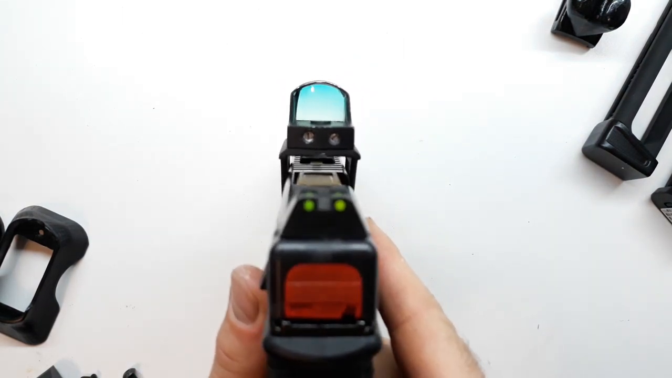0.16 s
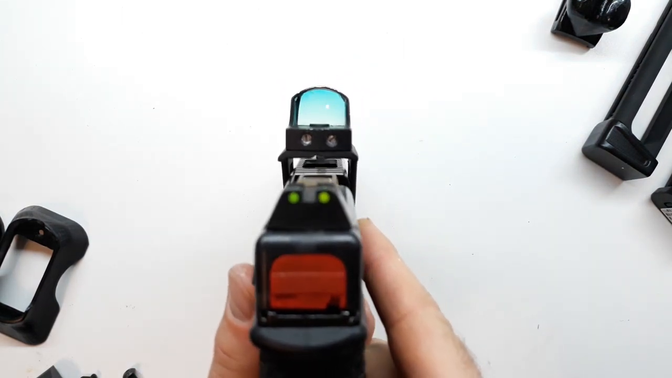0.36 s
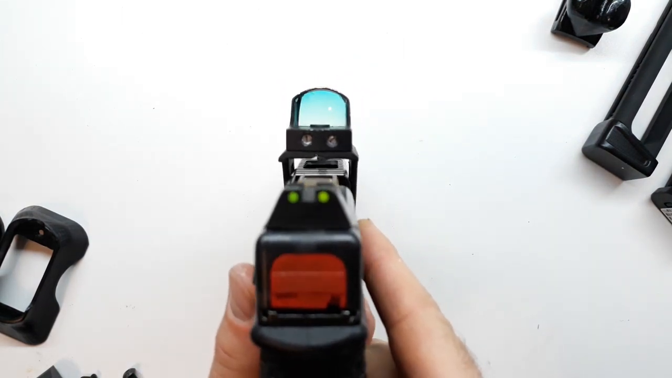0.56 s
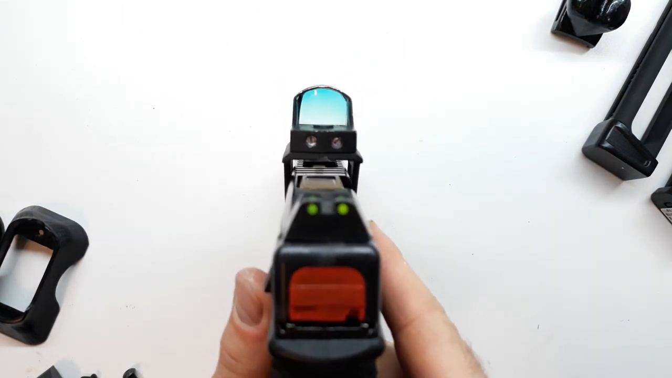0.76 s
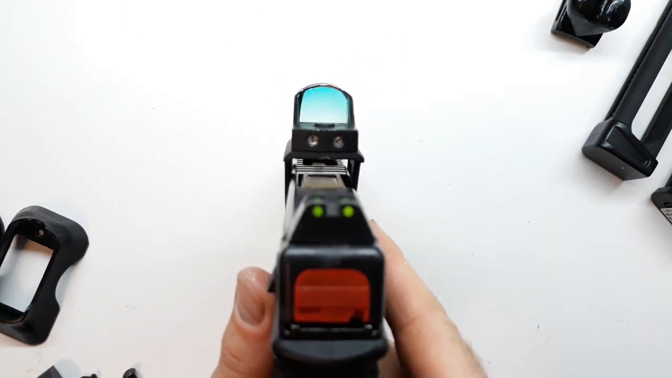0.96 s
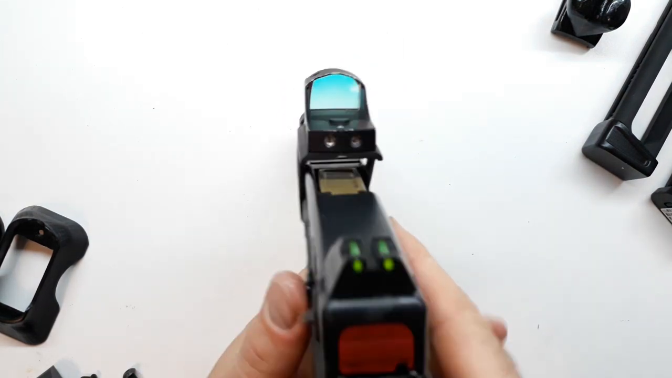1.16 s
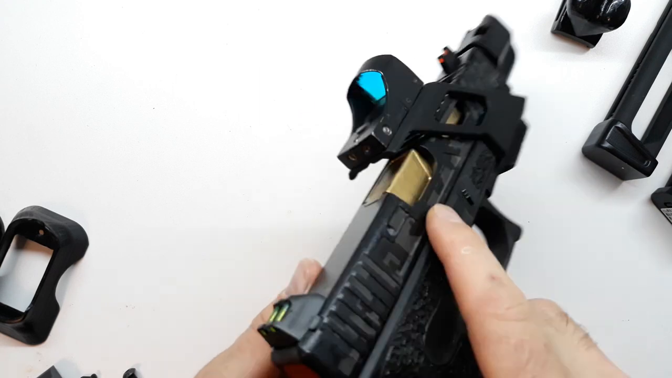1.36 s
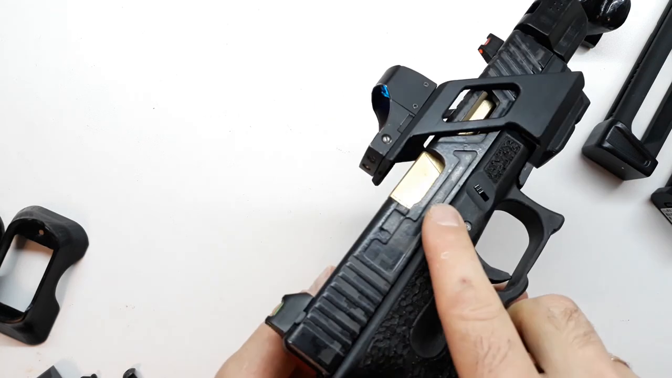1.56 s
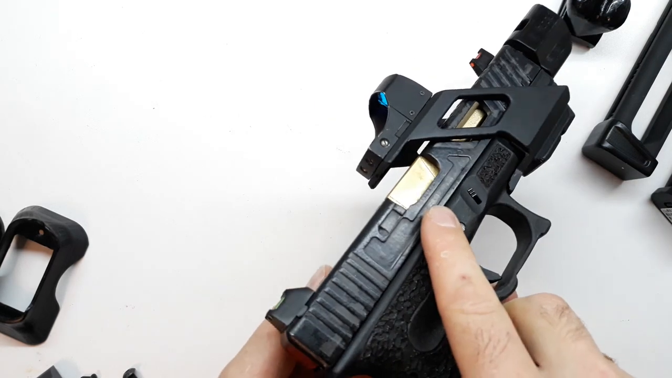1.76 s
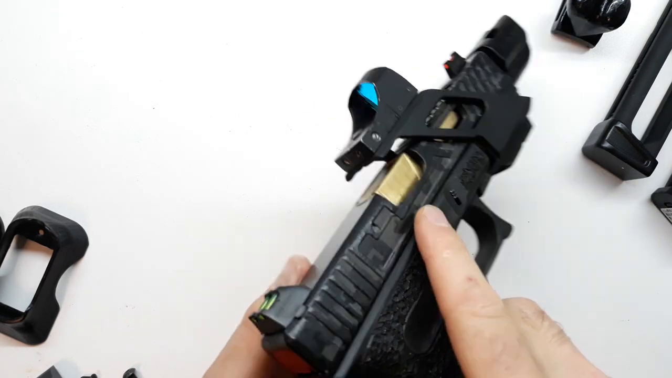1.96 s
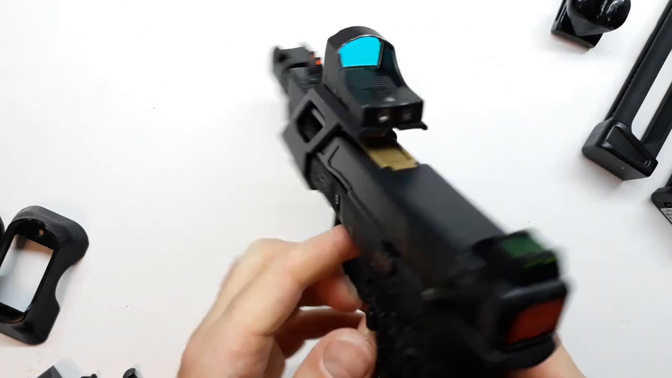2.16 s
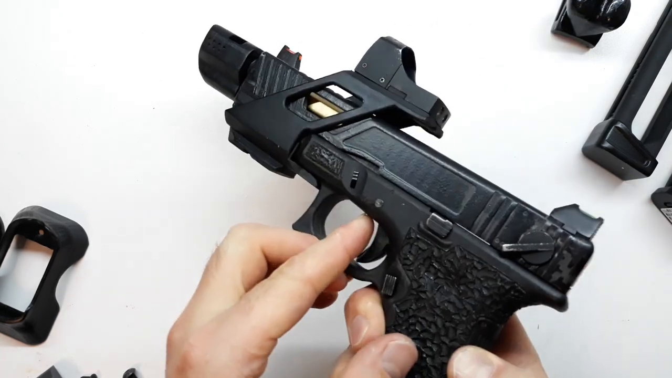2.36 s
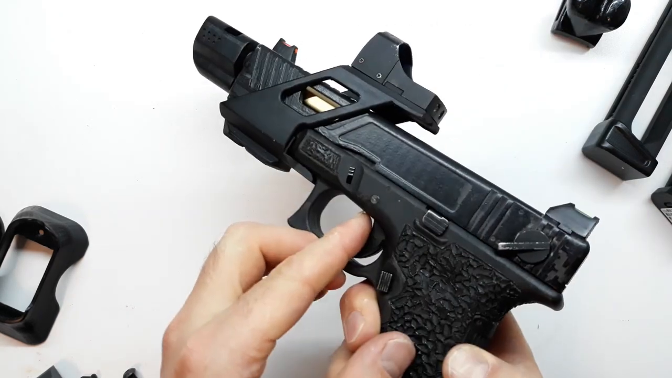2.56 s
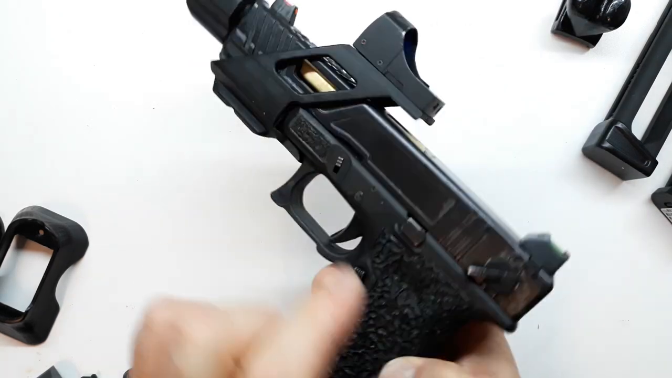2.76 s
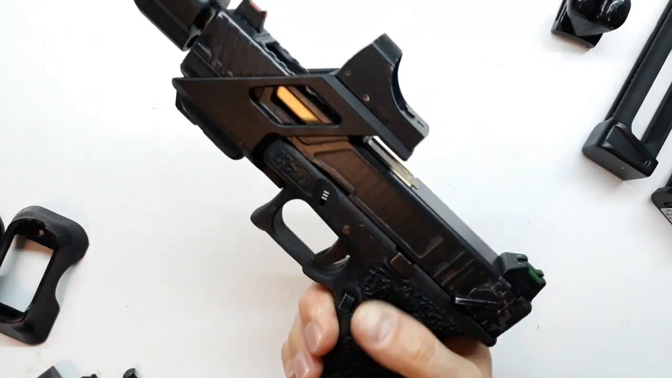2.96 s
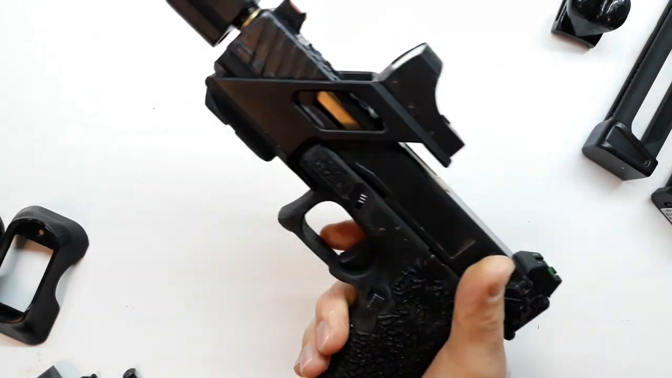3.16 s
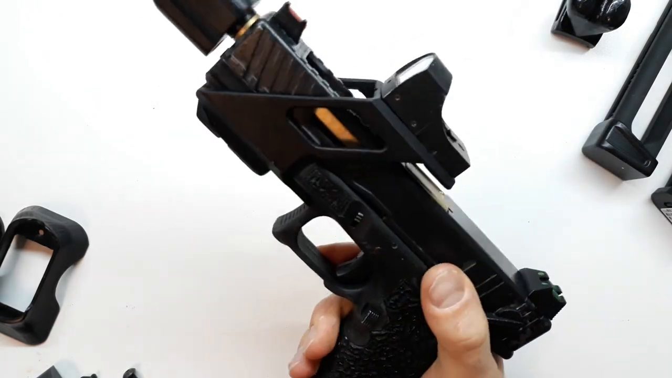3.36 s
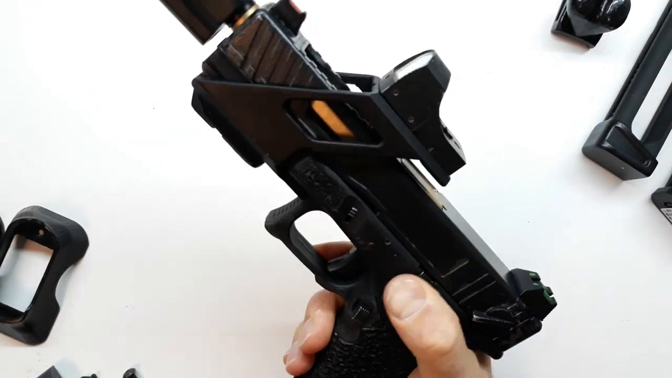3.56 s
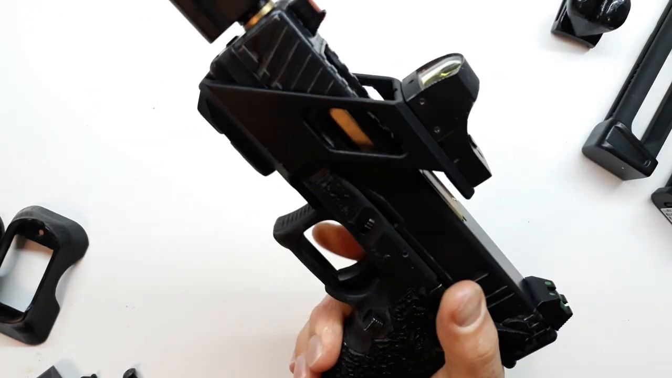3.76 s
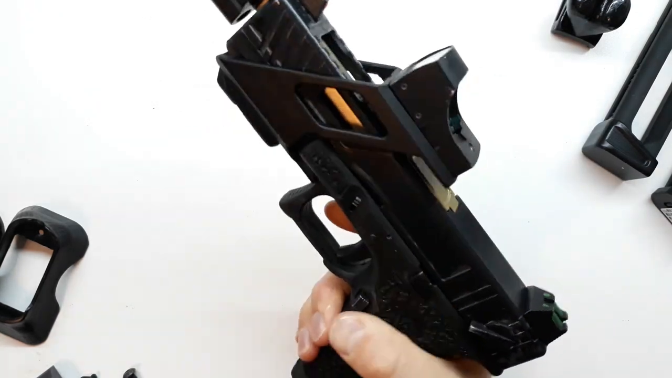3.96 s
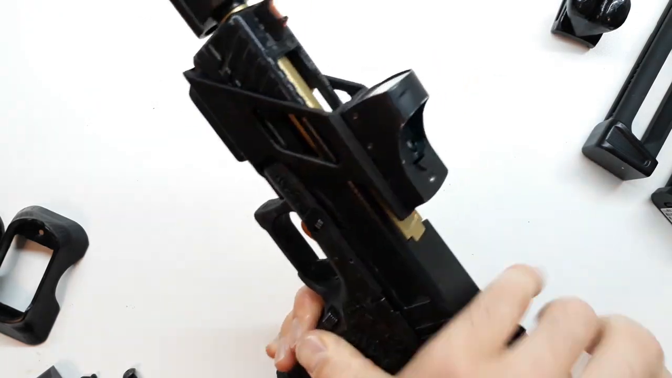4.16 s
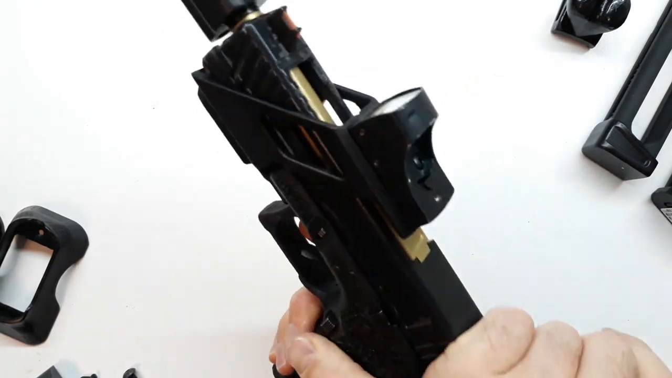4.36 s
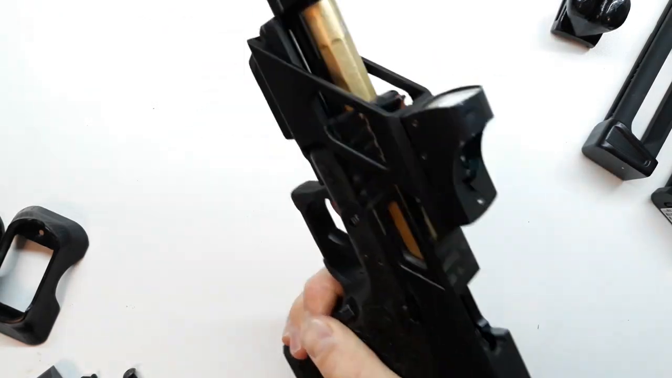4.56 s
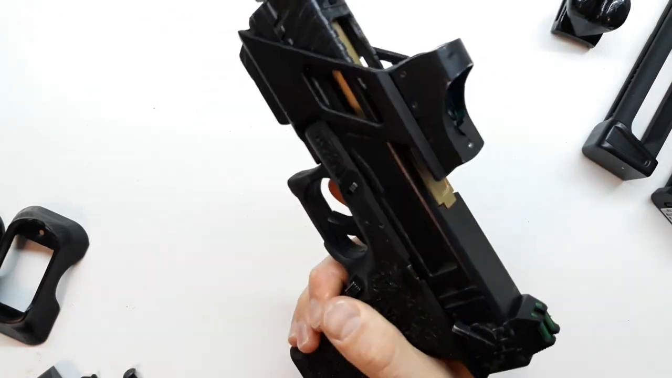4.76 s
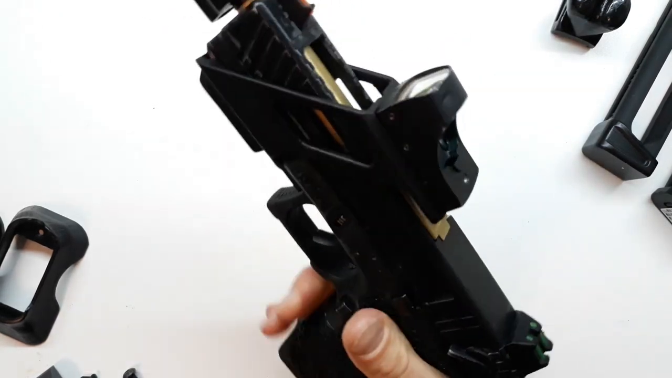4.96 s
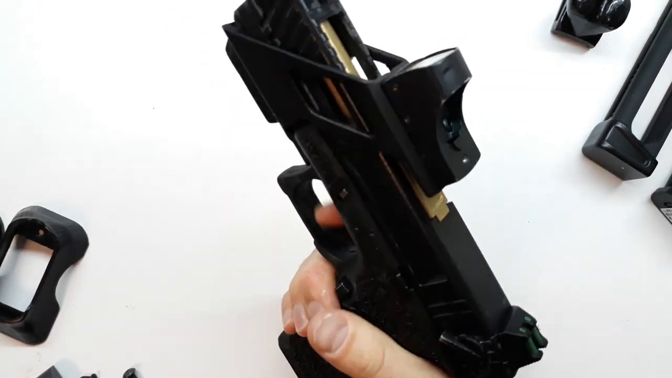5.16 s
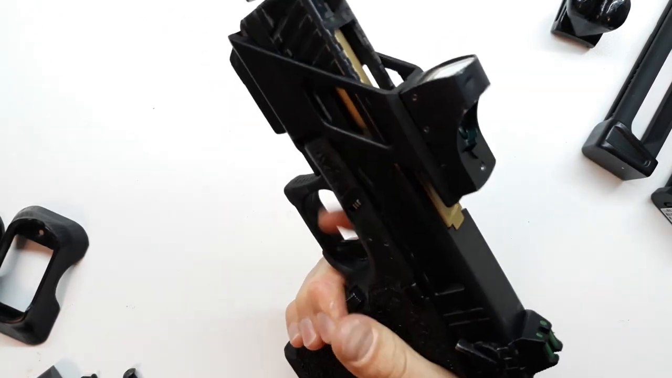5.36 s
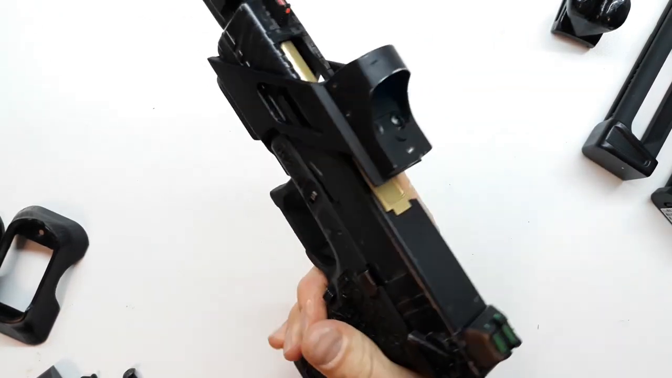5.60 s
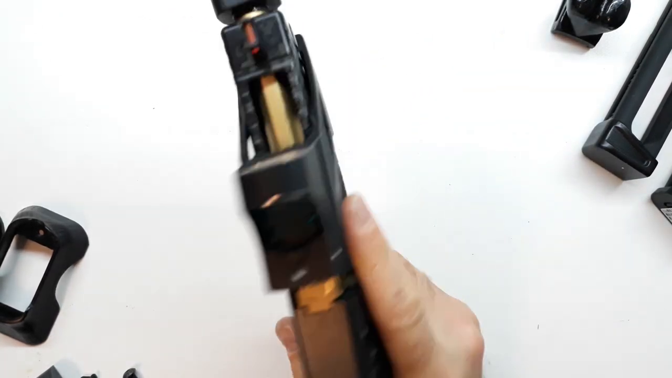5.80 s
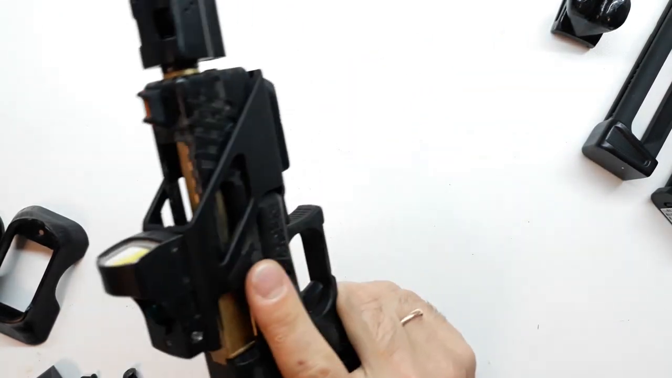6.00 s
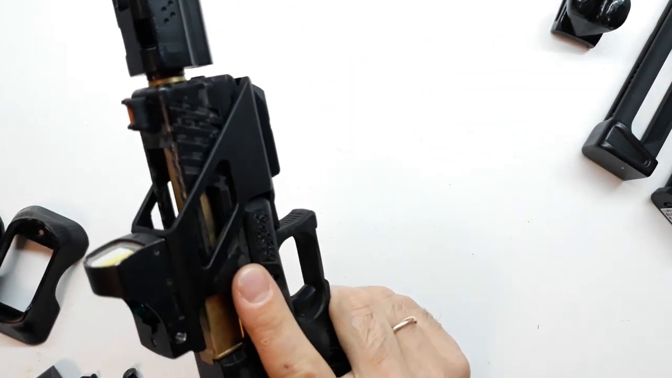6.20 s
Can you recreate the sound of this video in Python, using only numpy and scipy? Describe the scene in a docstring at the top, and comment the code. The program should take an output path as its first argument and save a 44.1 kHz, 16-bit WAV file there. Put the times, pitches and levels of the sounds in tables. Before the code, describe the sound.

A faint bed of low rumble, microphone hiss and swelling, throbbing hums runs throughout in a bare room, with a fan slowly gathering speed. From about 1.2 seconds a toy pistol is turned over close to the microphone: loose parts tick lightly and skin rubs softly on the grip. Small clicks come at 1.3, 2.3 and 3.2 seconds, with a clearer cluster around 3.7. At 4.4 seconds the slide is dragged back, clicking and scraping over its catches, and hits the rear stop with a loud clack at 4.5. Near 4.7 it slams home, the loudest sound, with a thump, a brief metallic ring and a short room echo. At 5.2 seconds the hammer drops with one sharp metallic snap. The overall level ducks at the clacks and stays down, leaving a fainter hum and a couple of tiny ticks until about 6.2 seconds.

```python
"""A bare room: a fan slowly gathers speed under swelling hums, low rumble and microphone hiss.
From about 1.2 s an airsoft pistol is turned over above a desk, parts ticking, skin rubbing on the grip.
At 4.4 s the slide is dragged back over its catches, hits the rear stop and slams home, metal ringing.
At 5.2 s the trigger drops the hammer. The gain control ducks at the clacks and stays down."""
import sys
import numpy as np
from scipy import signal
from scipy.fft import rfft, irfft, next_fast_len
from scipy.io import wavfile
from scipy.ndimage import uniform_filter1d, minimum_filter1d

SR = 44100
rng = np.random.default_rng(int(sys.argv[2]) if len(sys.argv) > 2 else 0)


def transcribe(u):
    """Save the signal u as a 16-bit wav file named by the first command-line argument.

    u: samples, shape (n,) or (channels, n), limited to [-1, 1]; the rate is SR.
    q: integer samples, one column per channel.
    """
    v = np.clip(np.atleast_2d(u).T, -1, 1)
    q = np.round(v * 32767).astype(np.int16)
    wavfile.write(sys.argv[1], SR, q)


N = 274743
TIME = np.arange(N) / SR
HUM_HZ, CUTOFF_HZ = 254.1, 15900

# fader rides for the fan's blade tone, the steady hum, the gliding hum and the rumble:
# (time [s], level [dB])
BLADE_RIDE = [(0, -65.5), (2.0, -76), (3.0, -69), (3.17, -47), (3.45, -46.5), (3.85, -41.5), (4.35, -45),
              (5.0, -47.5), (6.2, -63)]
HUM_RIDE = [(0, -65), (.58, -64.5), (.67, -51), (.78, -56), (1.08, -41), (1.27, -47), (1.6, -59.5),
            (1.89, -47.5), (2.14, -44), (2.65, -57.5), (2.98, -49), (3.45, -59), (3.63, -52), (4.3, -60),
            (6.2, -67)]
GLIDE_RIDE = [(0, -81), (.6, -65), (1.6, -66), (1.9, -48.5), (2.13, -42), (2.33, -60.5), (2.44, -49),
              (2.85, -66), (6.2, -72.5)]
RUMBLE_RIDE = [(0, -62), (.6, -65.5), (1.0, -59.5), (2.2, -57.5), (2.7, -59.5), (4.3, -55.5), (6.2, -59)]
# the fan's weaker orders: (multiple of the turning rate, level at full speed [dB])
FAN_OVERTONES = [(2, -59.5), (3, -75), (6, -63.5)]
# tone colour of the rumble, the hiss and the rubbing skin: (frequency [Hz], level [dB])
RUMBLE_EQ = [(25, -25), (50, -11.5), (90, -8), (160, -0.5), (250, -1.5), (330, -11), (480, -15.5),
             (700, -27.5), (1200, -31.5), (3000, -61)]
HISS_EQ = [(100, 1.5), (700, 2.5), (1500, 3), (3000, 1.5), (6500, 1.5), (8500, -7), (10500, -6.5),
           (13000, -4), (15500, -5.5)]
RUB_EQ = [(500, -20.5), (1300, -8.5), (1800, -10), (2500, -5.5), (3100, -8), (4200, -0.5), (5600, -0.5),
          (7200, -5.5), (9000, -25), (15000, -20)]
# the bare room's tail: (frequency [Hz], t60 [s])
ROOM_DECAY = [(200, 0.59), (700, .4), (1500, 0.4), (4000, 0.42), (7000, 0.39), (10000, .33), (15000, .28)]
# skin sliding on the grip: (middle [s], half length [s], level [dB])
GRIP_RUBS = [(1.35, 0.11, -67), (2.147, 0.062, -67), (2.74, 0.031, -68), (2.85, 0.084, -68),
             (2.968, 0.027, -58), (3.086, 0.079, -69.5), (3.23, 0.04, -61.5), (3.613, 0.065, -73.5),
             (3.921, .07, -62), (4.31, 0.1, -66.5), (5.15, .012, -54.5)]
# clicks and scuffs of loose parts, and the trigger's click just before the hammer falls: (time [s], level [dB],
# brightness [dB/octave], decay [ms])
PART_TICKS = [(1.1965, -47, -0.5, 6.7), (1.2527, -30, -1, 2.2), (2.2975, -53.5, 3, 2.1),
              (2.3040, -46.5, -3.5, 2.4), (3.1655, -42.5, -4, 3.1), (3.3210, -56, 9, 1.8),
              (3.3380, -55.5, -5, 7.6), (3.6985, -51, -9, 4.5), (3.7072, -32, 9, 1.7),
              (3.7245, -20.5, 2, 2.07), (3.8313, -39, -3, 1.5), (3.8900, -54, -5.5, 14),
              (4.2224, -36.5, -4, 2.2), (4.3262, -42, -6, 1.6), (5.2033, -23.5, 0.5, 2.3),
              (5.8540, -56.5, 3, 3.8), (6.1680, -49.5, 14, 3.6)]
# jolts of the frame, two from the slide, one from the hammer: (time [s], level [dB], pitch [Hz], t60 [s])
FRAME_JOLTS = [(4.5078, -8.5, 128, .028), (4.6700, 12, 106.1, 0.032), (5.2425, -34, 190, .025)]
# the rails singing under friction: (frequency [Hz], width [Hz], level [dB])
RAIL_BANDS = [(1130, 190, -7), (2470, 270, -6), (3750, 640, 4.5)]
# the hammer slips, falls and rebounds: (time [s], level [dB], brightness [dB/octave])
HAMMER_HITS = [(5.2403, -3.5, 4.5), (5.2426, 10.5, 0), (5.2462, 7, 0.5)]
# the slide rides over its catches, back and forth: (time [s], level [dB], brightness [dB/octave])
SLIDE_CATCHES = [(4.3790, -35.5, -3), (4.3812, -18, -1.5), (4.4265, -10.5, 0), (4.4418, -5.5, 1),
                 (4.4660, -2.5, 3), (4.4845, -4.5, -1), (4.4955, -7.5, -1), (4.6682, 1.5, 1.5)]
# the slide unlocks, hits the rear stop and slams home:
# (time [s], level [dB], brightness [dB/octave], bounce gap [s], loss per bounce [dB])
SLIDE_STOPS = [(4.3840, -2, -0.5, .0098, 4.5), (4.5066, 10, -0.5, .0111, 8), (4.671, 14, 1.5, .007, 4.5)]
# tone colour of a hit on the loose parts, the frame and the slide: (frequency [Hz], level [dB])
TICK_EQ = [(100, -22), (650, -28), (900, -13), (1300, -3.5), (1900, -3), (2500, 2), (3200, 1.5), (5500, 0),
           (7400, -8.5), (9000, -24), (10500, -31.5), (13000, -25.5), (15500, -27)]
FRAME_EQ = [(100, -27.5), (550, -30.5), (800, -11), (1250, -1), (1720, 1.5), (2300, 0), (3100, -2),
            (4100, 3.5), (4700, 1), (5700, 1), (7700, -3), (9000, -18), (10500, -23.5), (12500, -11.5),
            (15500, -13.5)]
SLIDE_EQ = [(100, -26.5), (500, -24), (780, -16.5), (1100, -5), (1450, -3.5), (2000, 0), (3800, -0.5),
            (5800, 1.5), (7400, -5), (8800, -16), (10300, -21.5), (12500, -14.5), (15500, -15.5)]
# ringing modes of the same three: (frequency [Hz], relative level [dB])
TICK_RING = [(1290, -6.5), (1800, -7.5), (2150, -6.5), (2620, 5), (3650, -5), (4700, -6), (5500, -6.5)]
FRAME_RING = [(1273, -8.5), (1633, -4), (1722, 0), (1940, -5), (2520, -5.5), (2790, -10), (3050, -8.5),
              (3665, -11), (4090, 2), (4183, -1.5), (4970, -6), (5450, 4), (5750, -6.5), (6340, -9)]
SLIDE_RING = [(1287, -45.5), (1723, -45.5), (2089, -45), (2476, -38), (2681, -42), (3666, -38.5),
              (4328, -46.5), (4613, -42.5), (4748, -54.5), (4915, -38), (4969, -39.5), (5512, -40),
              (6019, -49.5), (6169, -47.5), (6794, -45), (7154, -40.5)]


def from_db(db):
    """Decibels to gain."""
    return 10 ** (np.asarray(db) / 20)


def rms_one(x):
    """Scale to unit power."""
    return x / np.sqrt(np.mean(x ** 2) + 1e-20)


def ride(points):
    """A fader ride in dB, sample by sample."""
    return np.interp(TIME, *np.transpose(points))


def eq_db(eq, hz):
    """Read an EQ curve on a log-frequency axis."""
    points_hz, db = np.transpose(eq)
    return np.interp(np.log(hz + 1), np.log(points_hz), db)


def add(out, s, sound):
    """Mix a sound in at time s."""
    start = int(s * SR)
    out[start:start + len(sound)] += sound[:N - start]


def noise(eq):
    """Steady coloured noise at unit power."""
    hz = np.linspace(0, SR / 2, next_fast_len(N) // 2 + 2)
    white = rfft(rng.standard_normal(2 * len(hz) - 2))
    return rms_one(irfft(white * from_db(eq_db(eq, hz)))[:N])


def drift(per_s):
    """A random wobble with a spread near one."""
    return np.interp(TIME * per_s, np.arange(N), rng.standard_normal(N))


def tone(hz, db):
    """A sine that follows a pitch and an rms level."""
    return np.sqrt(2) * from_db(db) * np.sin(2 * np.pi * np.cumsum(hz) / SR)


def spin_up(start_hz, end_hz, lag_s):
    """A rate that rises quickly at first and then settles."""
    return end_hz + (start_hz - end_hz) * np.exp(-TIME / lag_s)


def fan(start_hz=35.46, full_hz=53.2, flutter_db=2.5, rise_db_per_decade=75):
    """A four-bladed fan gathers speed; its overtones grow with it."""
    turns_hz = spin_up(start_hz, full_hz, lag_s=3.0)
    rise_db = rise_db_per_decade * np.log10(turns_hz / full_hz)
    out = tone(4 * turns_hz, ride(BLADE_RIDE))
    for multiple, db in FAN_OVERTONES:
        out += tone(multiple * turns_hz, db + rise_db + flutter_db * drift(8))
    # the fifth order stands out once it climbs to the pitch of the steady hum
    fifth_hz = 5 * turns_hz
    fifth_db = -52 - 10 * np.log10(1 + ((fifth_hz - HUM_HZ) / 2.5) ** 2)
    return out + tone(fifth_hz, fifth_db)


def hums(waver_hz=1.1, flutter_db=0.7, beat_hz=6.6, partner_db=-6.5):
    """One hum wavers and throbs against a weaker partner just below; another glides up."""
    level_db = ride(HUM_RIDE) + flutter_db * drift(7)
    steady = tone(HUM_HZ + waver_hz * drift(7), level_db)
    partner = tone(HUM_HZ - beat_hz + waver_hz * drift(6), level_db + partner_db)
    glide = tone(spin_up(start_hz=72, end_hz=171.7, lag_s=0.99), ride(GLIDE_RIDE))
    return steady + partner + glide


def background(hiss_db=-76):
    """The bed: fan, hums, low rumble and microphone hiss."""
    tones = fan() + hums()
    rumble = from_db(ride(RUMBLE_RIDE)) * noise(RUMBLE_EQ)
    return tones + rumble + from_db(hiss_db) * noise(HISS_EQ)


def room(x, wet_db=-7.5, treble_db=-3, predelay_s=0.0012, build_s=0.0034, size=32768):
    """Diffuse echoes build up within a few milliseconds and die band by band."""
    t, hz = np.arange(size) / SR, np.fft.rfftfreq(size, 1 / SR)
    echoes = rfft(rng.standard_normal(size)) * from_db(treble_db * hz / CUTOFF_HZ)
    centres_hz, t60s = np.transpose(ROOM_DECAY)
    tail = np.zeros(size)
    for share, t60 in zip(np.eye(len(t60s)), t60s):
        band = irfft(echoes * np.interp(hz, centres_hz, share))
        tail += band * from_db(-60 * t / t60)
    tail *= 1 - np.exp(-np.maximum(t - predelay_s, 0) / build_s)
    return from_db(wet_db) * signal.fftconvolve(x, tail / np.linalg.norm(tail))[:N]


def rubbing(grain_db=3.0):
    """Skin catches and slips on the stippled grip."""
    pressure = sum(from_db(db) * np.exp(-((TIME - s) / half) ** 2) for s, half, db in GRIP_RUBS)
    return pressure * rms_one(noise(RUB_EQ) * from_db(grain_db * drift(400)))


def contact(eq, tilt, size=512):
    """One tight click at unit energy, brightened by tilt dB per octave."""
    hz = np.fft.rfftfreq(size, 1 / SR)
    octaves = np.log2(np.clip(hz, 1000, 10000) / 4000)
    cepstrum = irfft(np.log(from_db(eq_db(eq, hz) + tilt * octaves)))
    # minimum phase packs the energy into the attack
    cepstrum[1:size // 2] *= 2
    cepstrum[size // 2 + 1:] = 0
    click = irfft(np.exp(rfft(cepstrum)))
    return click / np.linalg.norm(click)


def metal_hits(hits, eq, modes, ring_db, ring_t60, rattle_db, rattle_s, spread_db=1.5, size=6144):
    """Each hit layers a crack of dense micro-contacts, a rattle of loose parts and the metal's ring."""
    out, t = np.zeros(N), np.arange(size) / SR
    hz, mode_db = np.transpose(modes)
    mode_db = mode_db - mode_db.max() + ring_db
    rings = np.sin(2 * np.pi * hz[:, None] * t) * from_db(-60 * t / ring_t60)
    rattle = from_db(rattle_db) * np.exp(-t / rattle_s)
    for s, level_db, tilt, decay_ms in hits:
        envelope = np.exp(-t * 1000 / decay_ms) + rattle
        crack = signal.fftconvolve(envelope * rng.choice([-1, 1], size), contact(eq, tilt))[:size]
        # every hit lands elsewhere and favours other modes
        struck_db = mode_db + tilt * np.log2(hz / hz.mean()) + spread_db * rng.standard_normal(len(hz))
        ring = (from_db(struck_db) * rng.choice([-1, 1], len(hz))) @ rings
        add(out, s, from_db(level_db) * (crack + ring))
    return out


def lasting(hits, decay_ms):
    """Give a run of hits one decay time."""
    return [(*hit, decay_ms) for hit in hits]


def ticks():
    """Loose parts click lightly as the pistol is handled, and the trigger clicks just before the hammer falls."""
    return metal_hits(PART_TICKS, TICK_EQ, TICK_RING,
                      ring_db=-21.5, ring_t60=0.1, rattle_db=-21, rattle_s=0.0087)


def thumps(push_db=-2, push_s=0.0005, top_hz=800, size=4000):
    """The weight under the clacks: a sharp push, then a heavily damped swing of the frame in the hand."""
    out, t = np.zeros(N), np.arange(size) / SR
    lowpass = signal.butter(2, top_hz, fs=SR, output="sos")
    push = from_db(push_db) * np.exp(-t / push_s)
    for s, level_db, hz, t60 in FRAME_JOLTS:
        swing = np.cos(2 * np.pi * hz * t) * from_db(-60 * t / t60)
        add(out, s, -from_db(level_db) * signal.sosfilt(lowpass, swing + push))
    return out


def hammer():
    """The falling hammer snaps against the frame and sets it ringing."""
    return metal_hits(lasting(HAMMER_HITS, decay_ms=2.1), FRAME_EQ, FRAME_RING,
                      ring_db=-16, ring_t60=0.076, rattle_db=-26, rattle_s=0.015)


def rails(scrape_db=-23, middle_s=4.415, half_s=0.03, grain_db=2.0):
    """As the pull starts the slide grinds along its rails and sings in their resonances."""
    swell = np.exp(-((TIME - middle_s) / half_s) ** 2)
    grind = swell * rng.standard_normal(N) * from_db(grain_db * drift(500)) + 1e-18
    ringing = np.zeros(N)
    for hz, width, db in RAIL_BANDS:
        band = signal.butter(2, [hz - width / 2, hz + width / 2], "band", fs=SR, output="sos")
        ringing += from_db(db) * np.sqrt(SR / 2 / width) * signal.sosfilt(band, grind)
    unlocked = TIME > SLIDE_STOPS[0][0]
    return from_db(scrape_db) * ringing * unlocked


def chatter(lead_s=0.0085, gap_s=0.0047, last_db=-10, growth_db=3.5, tilt=1.6, count=3):
    """On its run home the slide chatters, harder with every contact up to the slam."""
    last_s = SLIDE_STOPS[-1][0] - lead_s
    return [(last_s - k * gap_s, last_db - k * growth_db, tilt) for k in range(count)]


def bounces(tilt_step=0.6, count=4):
    """At each stop the slide strikes and rebounds, every contact weaker and a little brighter."""
    return [(s + k * gap_s, db - k * loss_db, tilt + k * tilt_step)
            for s, db, tilt, gap_s, loss_db in SLIDE_STOPS for k in range(count)]


def slide():
    """The hero sound: the slide clicks over its catches and clacks against its stops."""
    hits = lasting(SLIDE_CATCHES + chatter(), decay_ms=2.7) + lasting(bounces(), decay_ms=4.0)
    return metal_hits(hits, SLIDE_EQ, SLIDE_RING,
                      ring_db=-27.5, ring_t60=0.18, rattle_db=-23, rattle_s=0.034)


def scene(walls=3, low_cut_hz=42):
    """The pistol up close, its echoes from several walls and the bed behind it, in mono."""
    friction = rubbing() + rails()
    # the hits radiate a different fine structure in each direction
    directions = [slide() + hammer() + ticks() + friction for _ in range(walls)]
    echoes = sum(room(sound) for sound in directions) / np.sqrt(walls)
    # so small a body radiates no deep bass
    low_cut = signal.butter(2, low_cut_hz, "high", fs=SR, output="sos")
    pistol = signal.sosfilt(low_cut, directions[0] + echoes + thumps())
    return (pistol + background())[None]


def gain_control(x, ceiling_db=-1.5, release_db_per_s=700, settle_s=0.022, block=44):
    """A look-ahead limiter catches the peaks; a slow stage follows it down and stays there."""
    step_s = block / SR
    peaks = np.maximum.reduceat(np.abs(x), np.arange(0, N, block))
    over_db = np.maximum(20 * np.log10(peaks + 1e-9) - ceiling_db, 0)
    held_db = -minimum_filter1d(-over_db, size=7)   # looks three blocks ahead and behind
    fast_db, slow_db, duck_db = 0.0, 0.0, []
    for need_db in held_db:
        fast_db = max(need_db, fast_db - release_db_per_s * step_s)
        slow_db += max(fast_db - slow_db, 0) * step_s / settle_s
        duck_db.append(max(fast_db, slow_db))
    block_times = (np.arange(len(duck_db)) + 0.5) * step_s
    return x * from_db(-np.interp(TIME, block_times, uniform_filter1d(duck_db, size=3)))


def record(dry):
    """Gain control, then a steep cut of the very top."""
    high_cut = signal.ellip(10, 0.3, 80, CUTOFF_HZ, fs=SR, output="sos")
    return signal.sosfilt(high_cut, gain_control(dry[0]))[None]


dry = scene()
out = record(dry)
transcribe(out)
```